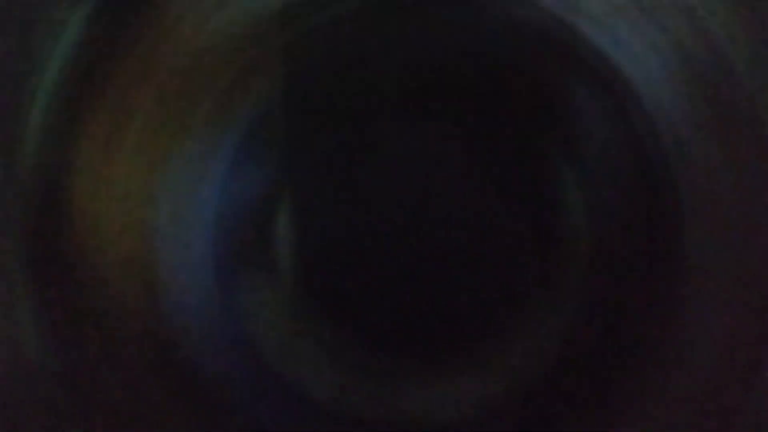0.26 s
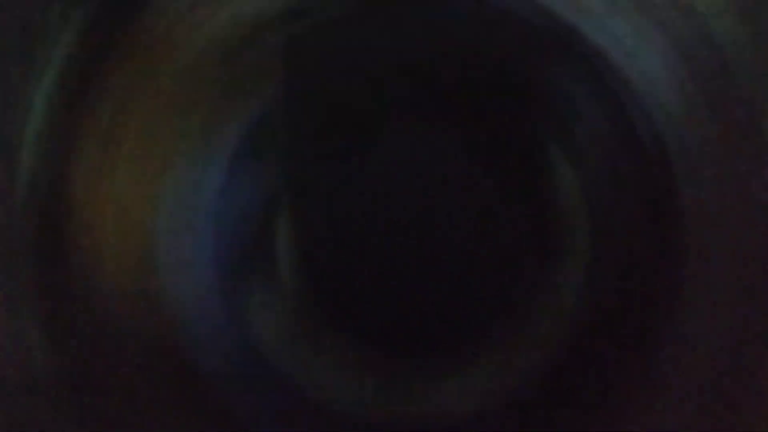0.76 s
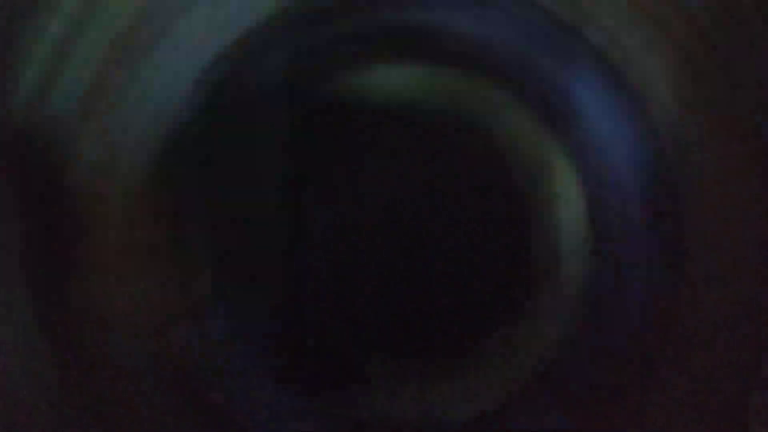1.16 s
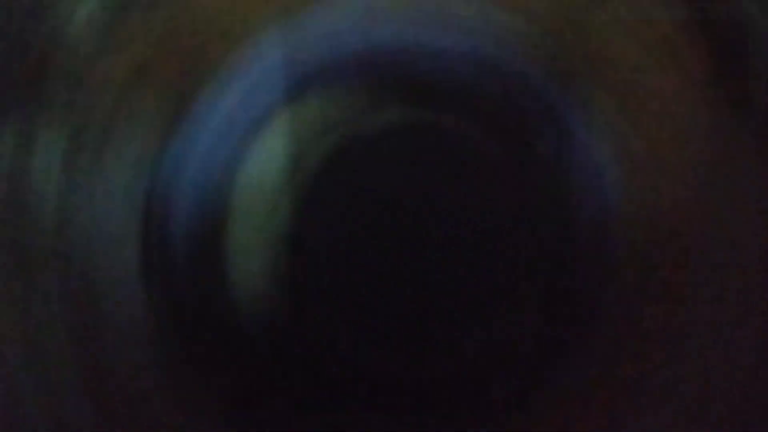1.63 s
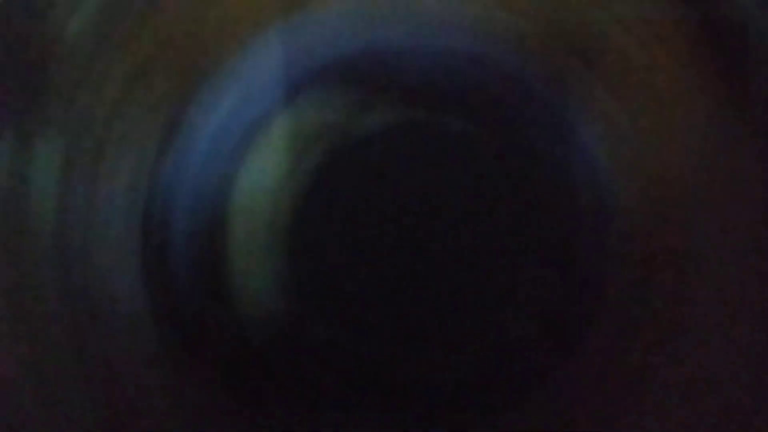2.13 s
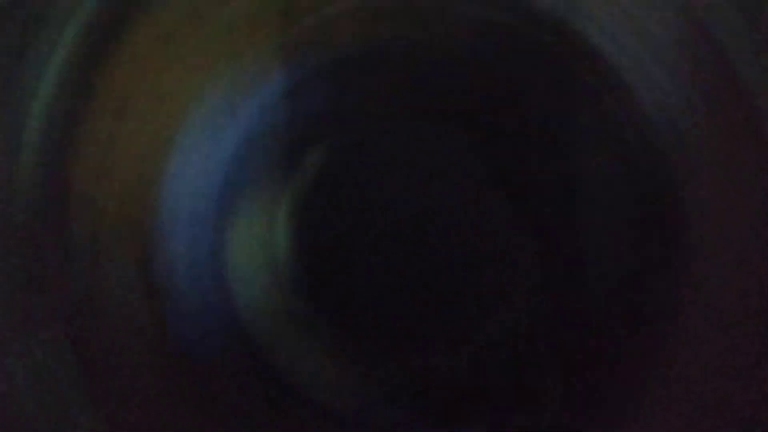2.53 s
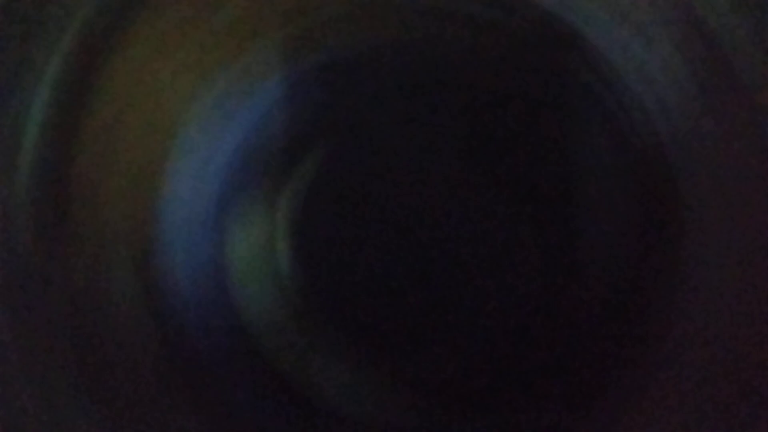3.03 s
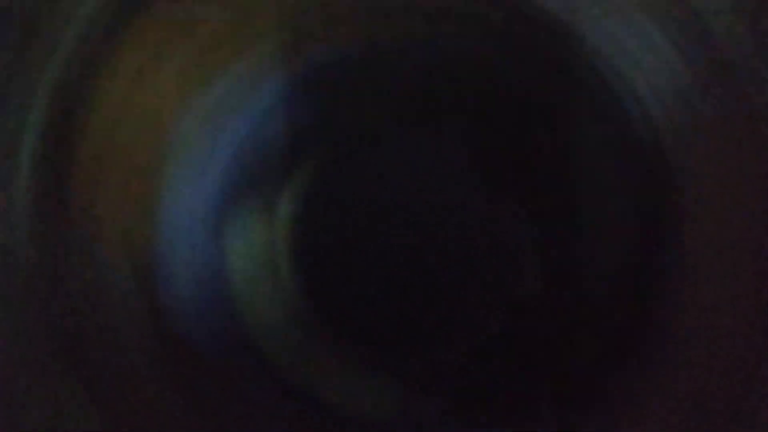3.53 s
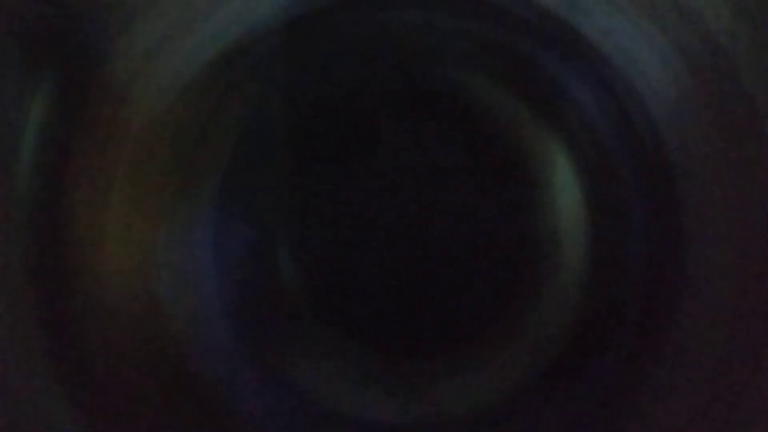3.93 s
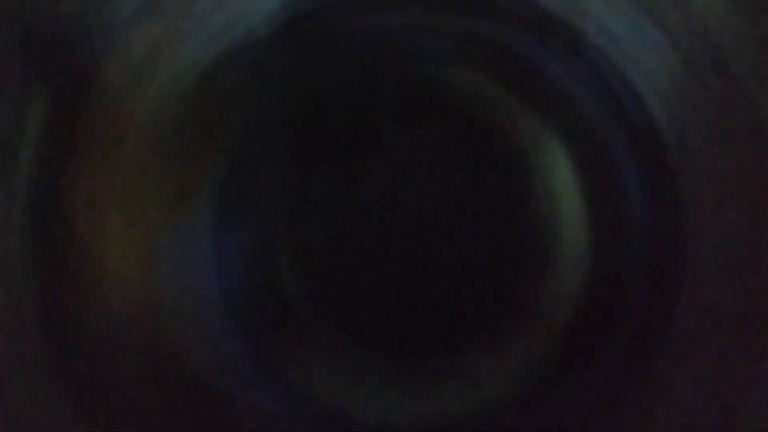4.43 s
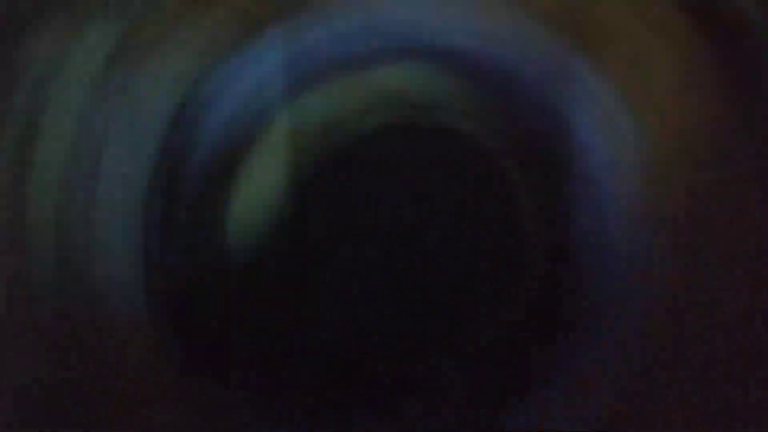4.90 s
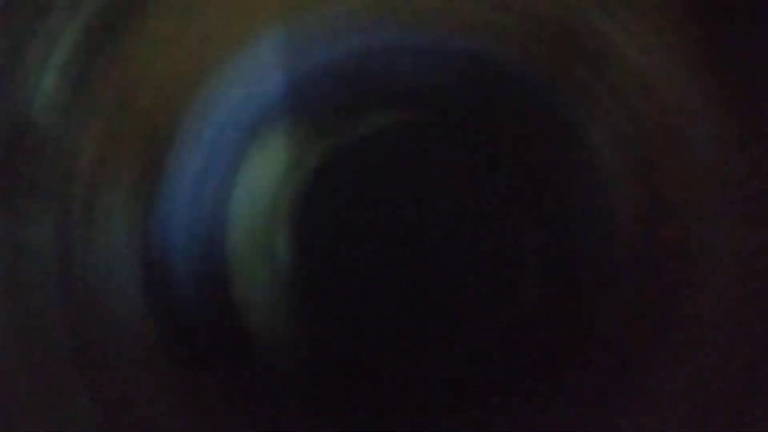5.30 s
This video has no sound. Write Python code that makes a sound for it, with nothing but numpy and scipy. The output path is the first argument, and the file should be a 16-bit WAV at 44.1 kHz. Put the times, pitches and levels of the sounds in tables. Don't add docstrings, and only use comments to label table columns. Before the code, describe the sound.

Steady low electric hum with a fast drum flutter and broad airy whoosh from a washing machine spinning in a small room.

```python
import sys
import numpy as np
from scipy import signal
from scipy.fft import rfft, irfft
from scipy.io import wavfile
from scipy.ndimage import uniform_filter1d

SR = 44100
rng = np.random.default_rng(int(sys.argv[2]) if len(sys.argv) > 2 else 0)


def log_audio(samples):
    frames = np.atleast_2d(samples).T
    limited = np.clip(frames, -1, 1)
    pcm = np.round(limited * 32767).astype(np.int16)
    wavfile.write(sys.argv[1], SR, pcm)


def magnitude_from_level(level_db):
    exponent = np.asarray(level_db, float) / 20
    return 10 ** exponent


N = 245195

CLOCK_HZ = (99.985, 11.945, 7.3265)
CLOCK_START = (.3768, .5581, .1705)
DRUM_HZ = CLOCK_HZ[1]
CAGE_FIRST_S, CAGE_PERIOD_S = .078, .705


def evened(x, axis=None):
    return x / np.sqrt(np.mean(x ** 2, axis=axis, keepdims=True) + 1e-20)


def read(points, hz, column=1):
    table = np.array(points)
    return np.interp(np.log(hz + 1), np.log(table[:, 0] + 1), table[:, column])


# time in seconds, unevenness in dB.
LOAD_SETTLING = [
    (0, 1),
    (1, 3.5),
    (2.3, 1),
    (3.2, -3),
    (4.6, -5),
    (5.56, -2),
]


def unevenness(t):
    return np.interp(t, *np.transpose(LOAD_SETTLING))


FLOOR_LAG_TURNS = .085, .0725, .044


def lag(hz, scattered):
    order = hz / DRUM_HZ
    by_order, by_square, lead = FLOOR_LAG_TURNS
    if hz < 72:
        return by_order * order + by_square * order ** 2 - lead
    cabinet = 3.1385 * (hz / 100) ** 2 - .7
    return cabinet + scattered * (hz > 160)


# drum order, level in dB rms.
DRUM_TONES = [(1, -52.8), (2, -50.7), (3, -44.1), (4, -44.9), (5, -46.5), (6, -47.4), (7, -39.8),
              (8, -54.9), (9, -39.3), (10, -47.4), (11, -50.7), (12, -46), (13, -40.8), (15, -47.6),
              (16, -41.9), (17, -48.7), (18, -52.2), (19, -52), (20, -45.9), (21, -45.3), (22, -49.8),
              (30, -51.2), (31, -51.2), (34, -53.3), (38, -52.3), (39, -52.6), (57, -58.8), (68, -56.5)]
# ripple order, drum order, level in dB rms.
RIPPLE_TONES = [(1, -1, -38.3), (1, 0, -45.9), (1, 1, -25.9), (1, 2, -54), (1, 3, -48.1), (1, 4, -48.2),
                (1, 10, -48), (1, 11, -51.2), (2, -2, -50.5), (2, -1, -51), (2, 0, -44), (2, 1, -44.9),
                (2, 2, -48.6), (2, 3, -45.5), (2, 7, -53.2), (3, 0, -53.1), (3, 1, -57.5), (5, 1, -55.8)]
# ripple order, drum order, belt order, level in dB rms.
BELT_TONES = [(0, 0, 15, -49.6), (0, 0, 16, -45.4), (0, 0, 17, -51), (0, 0, 19, -42.9), (0, 0, 20, -39.3),
              (0, 1, 17, -44.9), (0, -1, 20, -52), (1, -1, -1, -45.8), (1, 0, -1, -54.5), (1, 0, 2, -42.7),
              (1, 1, 3, -50.7), (1, 1, 4, -51.5), (1, 2, -1, -46.9), (2, 0, -1, -51.8)]
LOAD_SHARE = {(0, 7, 0): 1, (0, 9, 0): -.3, (0, 20, 0): .9, (1, -1, 0): -.3}


def hum(wobble_db=1, wobble_turns=.025, wobble_hz=.5):
    tones = [(0, drum, 0, db) for drum, db in DRUM_TONES]
    tones += [(ripple, drum, 0, db) for ripple, drum, db in RIPPLE_TONES]
    table = np.array(tones + BELT_TONES)
    t = np.arange(N) / SR
    knots = np.arange(0, N / SR + .1, .05)
    lowpass = signal.butter(2, wobble_hz, fs=20, output="sos")
    slow = signal.sosfiltfilt(lowpass, rng.standard_normal((len(table), 2, len(knots))))
    slow = evened(slow, axis=2)
    slow[np.argmax(table[:, 3])] *= .2
    settle_db = {orders: share * unevenness(knots) for orders, share in LOAD_SHARE.items()}
    out = np.zeros(N)
    for (*orders, db), (level, angle), scattered in zip(table, slow, rng.random(len(table))):
        hz = np.dot(orders, CLOCK_HZ)
        turns = hz * t + np.dot(orders, CLOCK_START) - lag(hz, scattered)
        turns += np.interp(t, knots, wobble_turns * angle)
        change_db = settle_db.get(tuple(orders), wobble_db * level)
        envelope = np.interp(t, knots, magnitude_from_level(db + change_db))
        out += np.sqrt(2) * envelope * np.cos(2 * np.pi * turns)
    return out


# frequency in Hz, density in dB per Hz.
NOISE_SLOPE = [(10, -70), (42, -77), (70, -72), (160, -71), (250, -69),
               (300, -70.5), (600, -68), (1000, -73.5), (1500, -74.5), (2500, -84.5), (3800, -90),
              (6000, -90), (10300, -96), (12000, -101), (15000, -106)]
# frequency in Hz, width in Hz, peak density in
# dB per Hz.
RESONANT_MODES = [(23, 6, -63), (60, 6, -64), (81, 9, -58), (91, 6, -63), (114, 9, -55), (139, 12, -59),
                  (148, 6, -62), (178, 12, -60), (200, 20, -61), (230, 26, -59.5), (256, 14, -64),
                  (280, 18, -62.5), (353.6, 64, -63), (419.4, 41, -60), (458.6, 54, -59.5), (548, 65, -69),
                 (710, 110, -68), (804, 110, -69), (1100, 380, -75.5), (2106, 270, -82), (2953, 320, -82.5),
                 (5250, 500, -91), (8150, 2060, -84.5), (9320, 830, -85.5), (9870, 320, -87.5)]
WHISTLE_PITCH_HZ = 728, 813, 1608, 1890, 2281, 6862, 6935
# width in Hz, peak density in dB per Hz.
WHISTLE_SHAPE = [(25, -75), (30, -68.5), (22, -70), (22, -71), (20, -79), (45, -84), (35, -84)]


def colour(hz):
    whistles = [(f, *shape) for f, shape in zip(WHISTLE_PITCH_HZ, WHISTLE_SHAPE)]
    power = magnitude_from_level(read(NOISE_SLOPE, hz)) ** 2
    for f, width, db in RESONANT_MODES + whistles:
        power += magnitude_from_level(db) ** 2 / (1 + (2 * (hz - f) / width) ** 2) ** 2
    return power


def turbulence(repeat=.2):
    hz = np.fft.rfftfreq(N, 1 / SR)
    off_hz = (hz / DRUM_HZ - np.round(hz / DRUM_HZ)) * DRUM_HZ
    band = (hz > 490) * (hz < 2500)
    comb = np.exp(-(off_hz / .25) ** 2) * band
    power = colour(hz) * (1 - repeat * band + repeat * 27 * comb)
    return irfft(rfft(rng.standard_normal(N)) * np.sqrt(power * SR / 2), N)


# frequency in Hz, depth in dB once a drum turn, depth in dB twice a turn.
THROB_DEPTH = [(200, .2, .3), (750, .3, .8), (1600, .3, .35), (3000, .5, .8), (5000, .5, .1),
               (9000, .35, .1), (13000, .5, .1)]


def throb(hz, t):
    turn = 2 * np.pi * DRUM_HZ * t
    once_db = np.outer(read(THROB_DEPTH, hz), np.cos(turn - 2 * np.pi * .27))
    twice_db = np.outer(read(THROB_DEPTH, hz, column=2), np.cos(2 * turn - 2 * np.pi * .15))
    return once_db + twice_db


# frequency in Hz, half width in Hz, dB per rock, share of the settling (ratio),
# dB per beat.
SWAYING_PARTS = [(450, 90, 0.6, 0.26, .5), (1500, 1200, .4, 0.048, 0.43), (3070, 260, 1.6, 0.2, 1.2),
                 (8000, 1200, 0.2, .02, 0.2), (9600, 540, 1.4, .02, 0)]


def sway(hz, t):
    lean = 2 * np.pi * .94 * (t - 2.754)
    rock = np.cos(lean) - .23 * np.sin(2 * lean)
    uneven_db = unevenness(t)
    uneven_db = uneven_db - uneven_db.mean()
    beat = np.cos(2 * np.pi * (CLOCK_HZ[0] - 8 * DRUM_HZ) * (t - .059))
    cage = np.cos(2 * np.pi * (t - CAGE_FIRST_S) / CAGE_PERIOD_S)
    field_db = .5 * np.outer(np.exp(-((hz - 9600) / 700) ** 2), cage)
    for f, width, rock_db, share, beat_db in SWAYING_PARTS:
        swell_db = rock_db * rock + share * uneven_db + beat_db * beat
        field_db += np.outer(np.exp(-((hz - f) / width) ** 2), swell_db)
    return field_db


def puffs(hz, t, puff_db=4.5, puff_s=.028):
    since_s = (t - CAGE_FIRST_S + CAGE_PERIOD_S / 2) % CAGE_PERIOD_S - CAGE_PERIOD_S / 2
    return puff_db * np.outer(np.exp(-((hz - 10600) / 1200) ** 2), np.exp(-(since_s / puff_s) ** 2))


def rush(patchy_db=.45):
    hz, t, z = signal.stft(turbulence(), SR, nperseg=512, noverlap=384)
    field_db = throb(hz, t) + sway(hz, t) + puffs(hz, t)
    patches = uniform_filter1d(rng.standard_normal(z.shape), size=6, axis=0)
    patches = uniform_filter1d(patches, size=40, axis=1)
    field_db += patchy_db * evened(patches) * (hz > 200)[:, None]
    return signal.istft(z * magnitude_from_level(field_db), SR, nperseg=512, noverlap=384)[1][:N]


def scene():
    return (hum() + rush())[None]


def band_limit(x):
    return signal.sosfilt(signal.butter(12, 15710, fs=SR, output="sos"), x)


def record(dry):
    rounded = .45 * np.tanh(1.03 * dry / .45)
    return band_limit(rounded)


dry = scene()
out = record(dry)
log_audio(out)
```